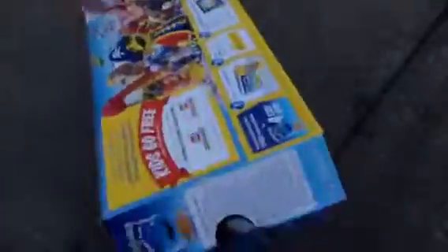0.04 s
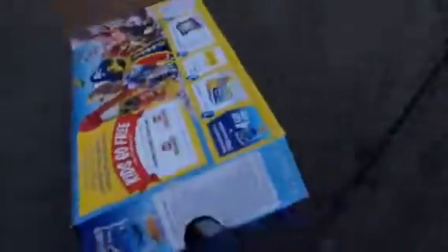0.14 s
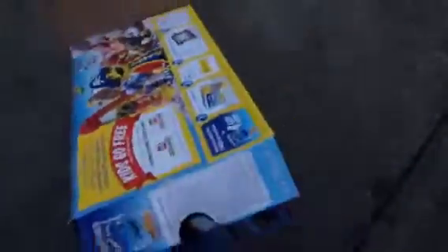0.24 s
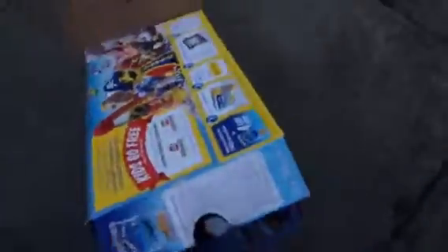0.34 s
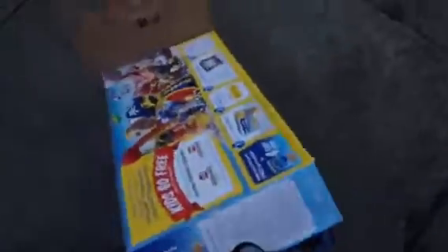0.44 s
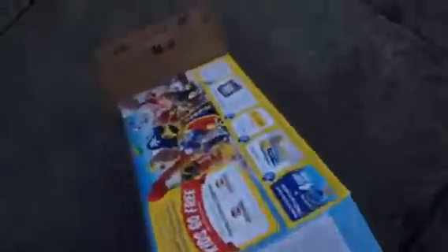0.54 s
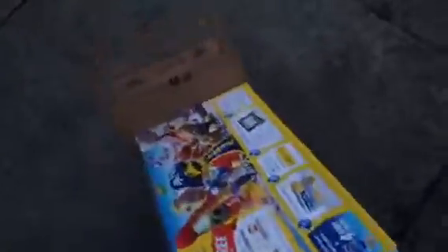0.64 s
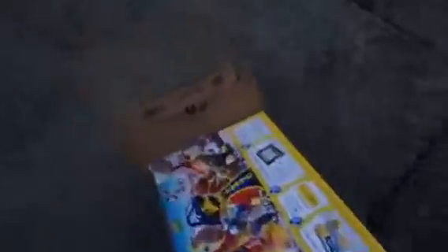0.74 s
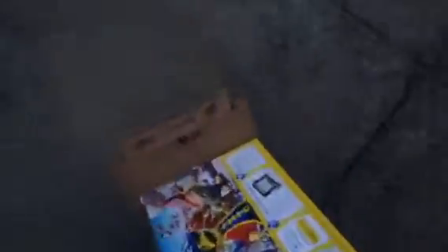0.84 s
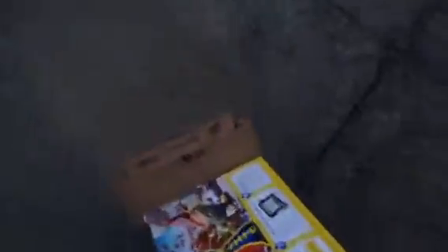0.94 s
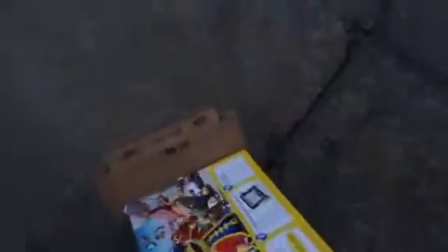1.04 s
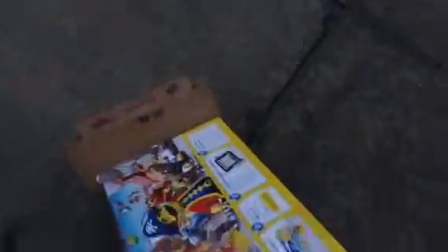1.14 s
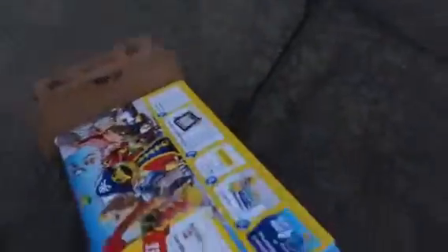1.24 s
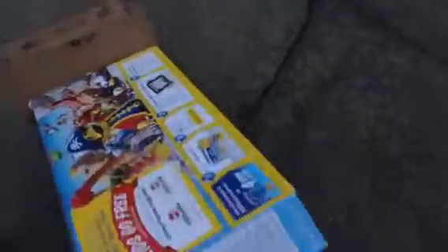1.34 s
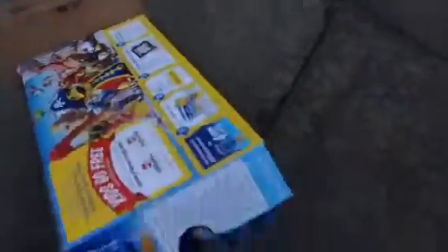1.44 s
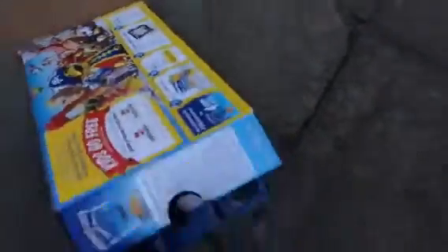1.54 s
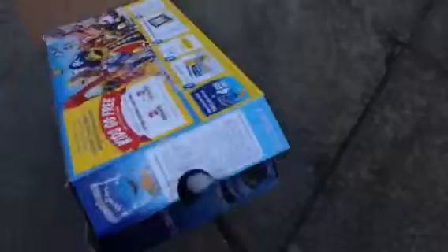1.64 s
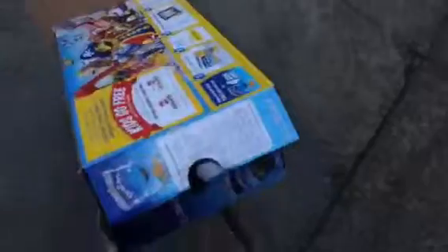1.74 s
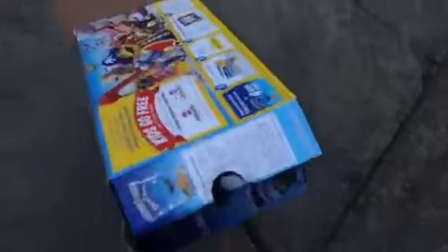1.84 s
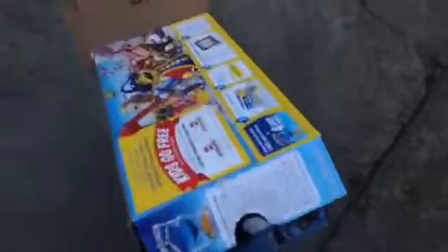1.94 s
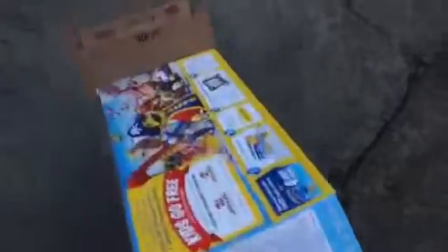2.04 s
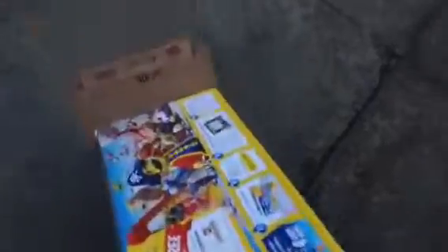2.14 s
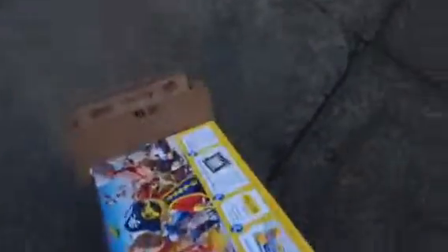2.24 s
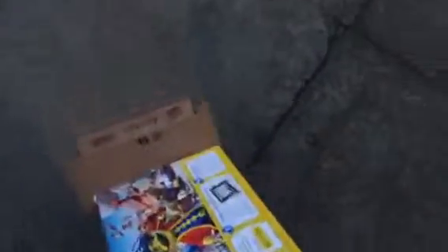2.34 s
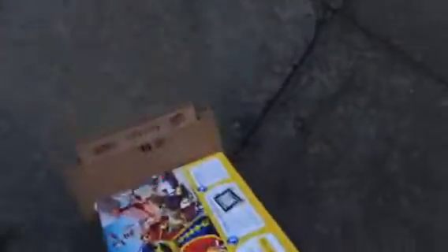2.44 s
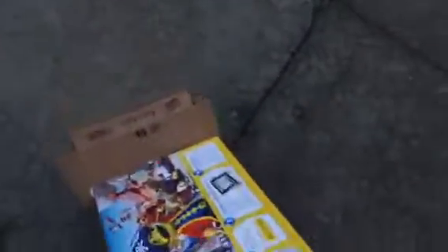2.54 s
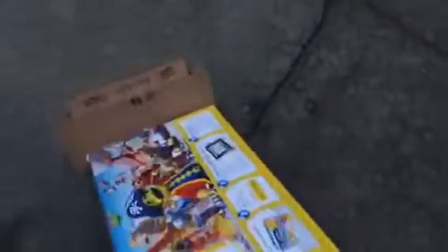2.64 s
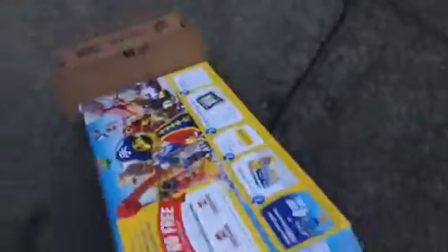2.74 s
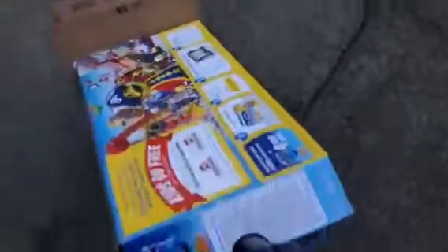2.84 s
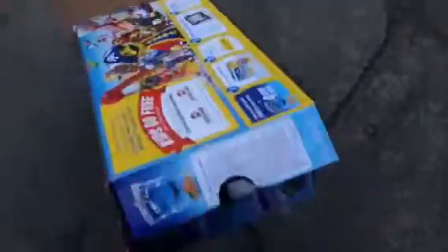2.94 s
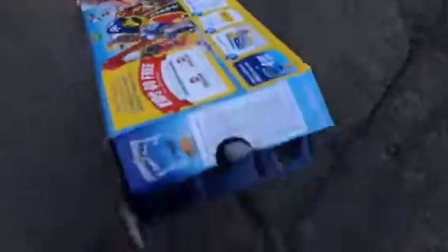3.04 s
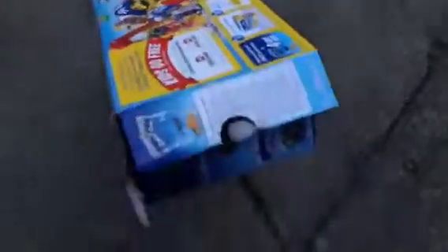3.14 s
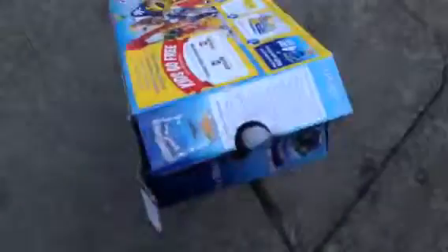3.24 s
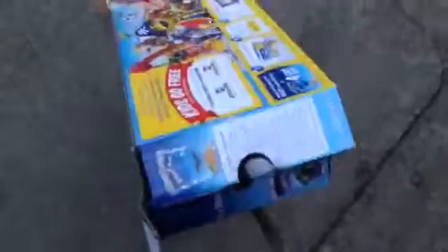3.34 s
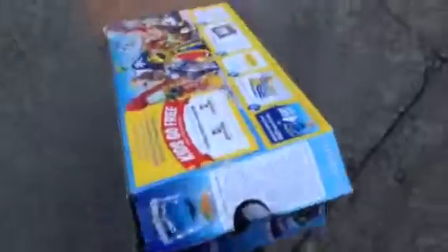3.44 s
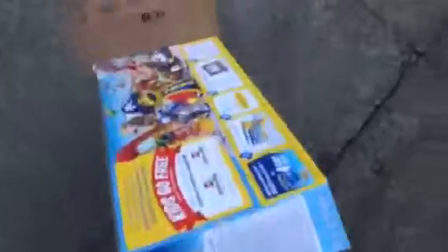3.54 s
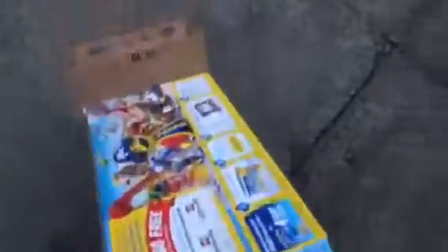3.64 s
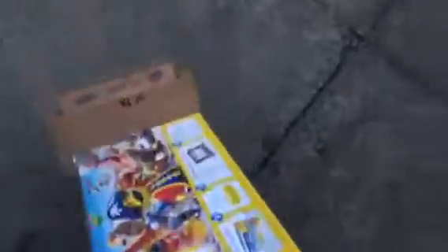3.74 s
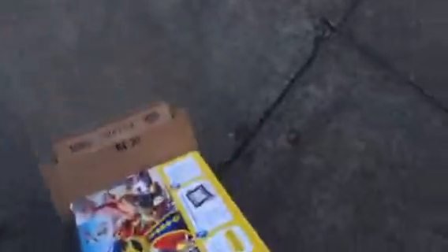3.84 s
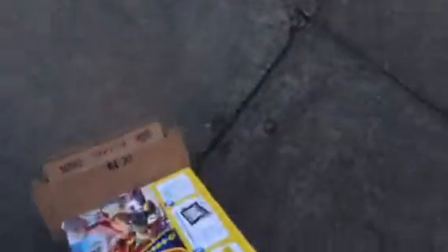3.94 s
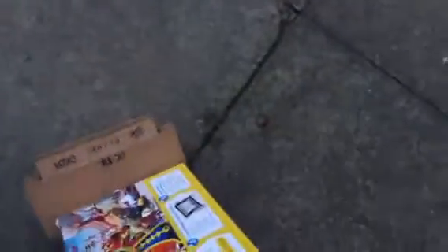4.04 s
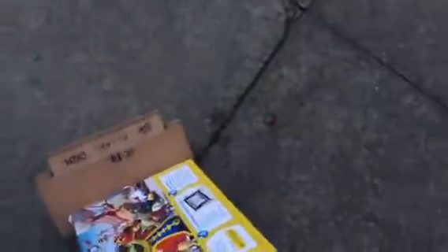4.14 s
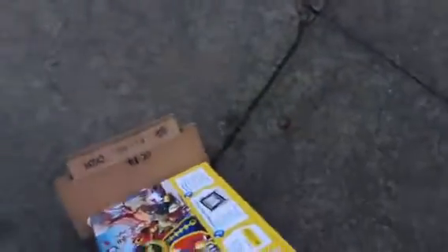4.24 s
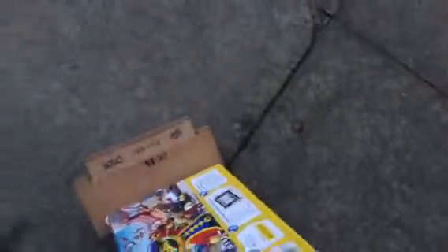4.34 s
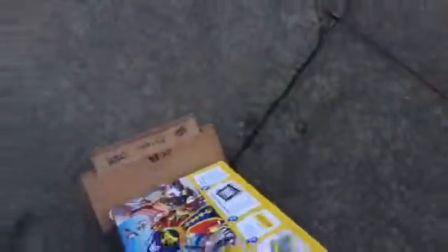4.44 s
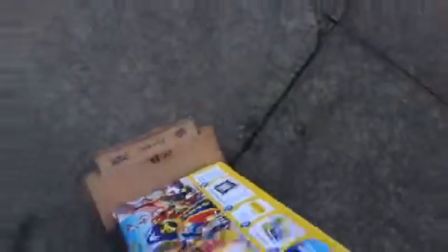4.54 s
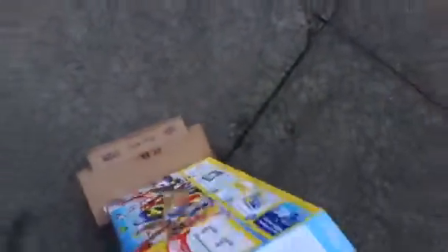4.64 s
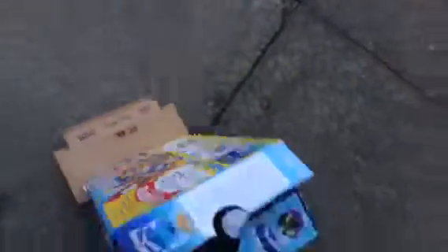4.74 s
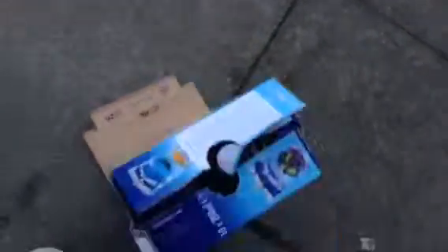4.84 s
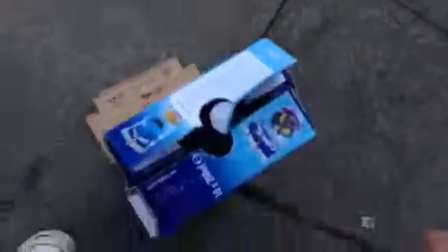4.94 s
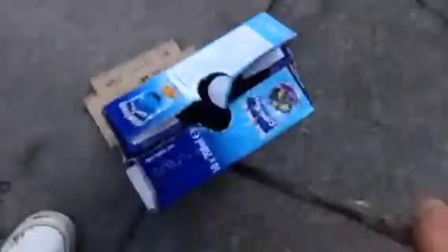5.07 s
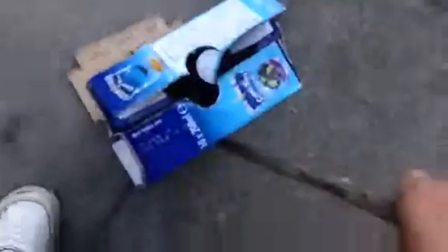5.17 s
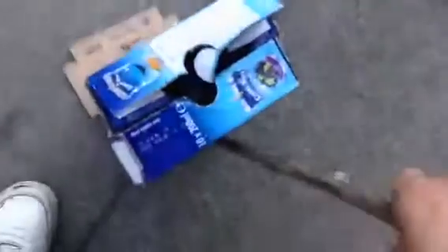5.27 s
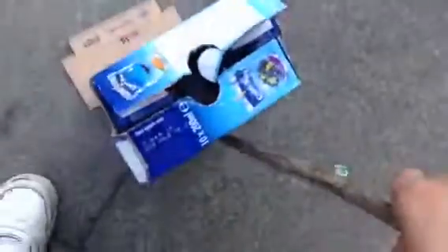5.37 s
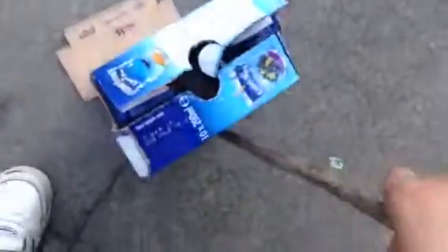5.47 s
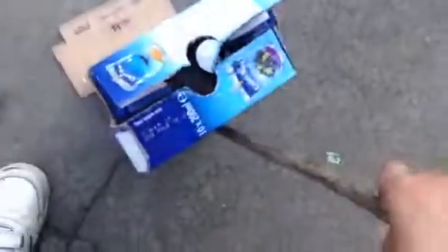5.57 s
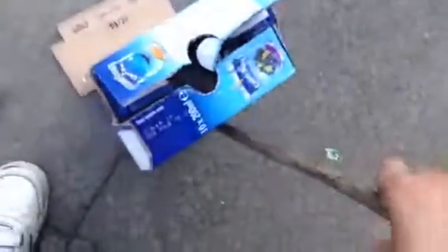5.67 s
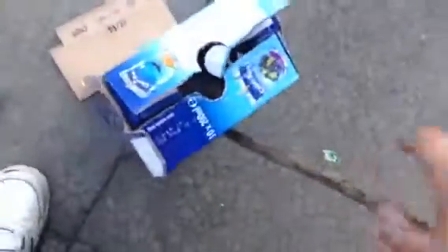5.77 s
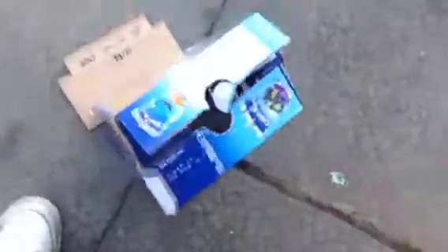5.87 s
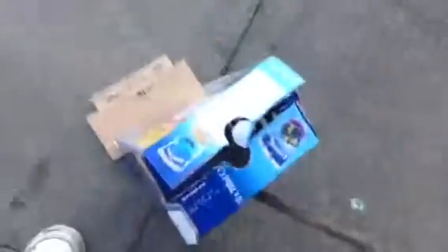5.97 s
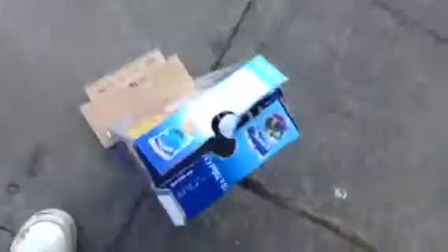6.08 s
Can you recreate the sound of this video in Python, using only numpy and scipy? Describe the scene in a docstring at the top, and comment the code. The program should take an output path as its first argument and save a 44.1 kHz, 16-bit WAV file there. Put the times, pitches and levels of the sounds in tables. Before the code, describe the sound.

Outdoors, close by, cardboard scrapes and chatters over gritty concrete, swelling and easing six times as an empty box is pushed along. After about four seconds it stops with a small hollow knock, and a quick cluster of light taps follows as it tips. A bird whistles in the background throughout, left faint at the end with a low hum of wind and far traffic.

```python
"""An empty cardboard box is shoved over concrete paving in six strokes, close by.
Friction makes its edge hop some 50 to 70 times a second; each landing crushes grit and excites
the resonances of the panels. The box then drops flat and tips over with a few light taps.
A songbird, farther off, whistles throughout and adds a few rasping calls near the end.
Walls and ground return diffuse echoes, and wind and distant roads murmur underneath."""
import sys
import numpy as np
from scipy import signal
from scipy.io import wavfile
from scipy.ndimage import uniform_filter1d

SR = 44100
rng = np.random.default_rng(int(sys.argv[2]) if len(sys.argv) > 2 else 0)


def pcm_store(signal):
    """Save signal as 16-bit PCM."""
    levels = np.round(np.clip(np.atleast_2d(signal), -1, 1) * 32767)
    wavfile.write(sys.argv[1], SR, levels.astype(np.int16).T)


N = 269397
TIME = np.arange(N) / SR
HZ = np.fft.rfftfreq(4096, 1 / SR)  # frequency grid of the filters
CREEP_DB, REST_S, REST_DB_PER_S = -28, 4.2, 155  # the box creeps between shoves, then comes to rest

# Shoves: start t/s, fastest t/s, end t/s, card rasp level/dB, grit level/dB, panel boom level/dB,
# exponent of speed while gaining, and while slowing, hop rate/Hz, share of the power in hops (0-1)
STROKES = [(-.25, 0.028, .43, -33, -34.5, -36, .7, 0.66, 52, 0.7),
           (0.467, 0.919, 1.133, -32, -36, -35, 0.83, 0.92, 60, 0.73),
           (1.162, 1.356, 1.876, -33, -33, -36.5, 1, 0.74, 61, 0.56),
           (1.911, 2.317, 2.567, -30.5, -36, -34.5, 0.73, 1, 65, 0.6),
           (2.6, 2.83, 3.291, -32.5, -31.5, -36, 0.68, 0.69, 70, 0.41),
           (3.358, 3.88, 4.07, -33.5, -35.5, -38, 0.54, 0.85, 55, 0.62)]
# Hard landings on bumps in the concrete: t/s, grit level/dB, card rasp level/dB
LANDINGS = [(0.0315, -30, -26), (0.1296, -38, -30), (0.1431, -13, -26.5), (0.2279, -23.5, -33),
            (0.3045, -46, -35.5), (0.3411, -28.5, -30), (0.3561, -21.5, -28), (0.562, -33, -25.5),
            (0.7133, -15, -18.5), (0.7325, -26, -20), (0.7485, -26.5, -21.5), (0.776, -33, -29),
            (0.8125, -29, -24.5), (0.8735, -26.5, -30), (0.9025, -31, -32), (0.9165, -29, -31),
            (0.9325, -35.5, -32), (0.9485, -33, -30), (0.9955, -35, -37), (1.0115, -35, -34),
            (1.0285, -31, -31), (1.2441, -26, -22.5), (1.2645, -19.5, -29.5), (1.3079, -17, -40),
            (1.3289, -31, -25), (1.4205, -32, -32.5), (1.4495, -45, -23), (1.5015, -25, -43),
            (1.5335, -40, -23), (1.5539, -19, -20.5), (1.5868, -19, -35), (1.6367, -22, -40),
            (1.7255, -30, -29), (1.9555, -38, -32), (2.0068, -23.5, -21), (2.0555, -34, -21.5),
            (2.0737, -30, -23.5), (2.1086, -25.5, -25), (2.1425, -26.5, -29), (2.1779, -29.5, -24.5),
            (2.2385, -26, -24.5), (2.2975, -35, -21.5), (2.3815, -29, -31), (2.3885, -29.5, -25),
            (2.7165, -32, -28.5), (2.7756, -23, -29), (2.8675, -28.5, -28), (2.9402, -17.5, -29),
            (2.9704, -24, -24), (3.0205, -17, -27), (3.0305, -21, -31.5), (3.0748, -25, -26),
            (3.1048, -22, -58), (3.1985, -27, -53), (3.2675, -25, -39), (3.3702, -23.5, -27.5),
            (3.4306, -28.5, -51), (3.5045, -29.5, -24), (3.5365, -46, -23), (3.5518, -47, -24.5),
            (3.565, -31.5, -21.5), (3.6045, -28, -26), (3.6212, -25, -29), (3.6808, -31, -23),
            (3.7685, -23, -18.5), (3.7932, -28, -25), (3.8203, -27, -20), (3.8422, -28, -21.5),
            (3.862, -25, -16.5), (3.8822, -31, -22), (3.9052, -26.5, -20.5), (3.922, -32, -19),
            (3.9598, -39, -23), (4.0063, -28.5, -26.5), (4.027, -34, -35.5)]
# Broad spectrum of card on concrete: f/Hz, relative level/dB
CARD_SPECTRUM = [(25, -29.5), (60, -29.5), (90, -25), (125, -8.5), (180, 3.5), (260, -3.5), (380, -1),
                 (480, -7.5), (560, -0.5), (1250, 2.5), (2000, -7.5), (2950, -19.5), (3400, -16.5),
                 (7500, -21.5), (12500, -20), (14800, -24.5), (16000, -42)]
# Modes of the panels and the cavity: f/Hz, bandwidth/Hz, level/dB re the broad spectrum
BOX_MODES = [(199, 43, 5.5), (306.4, 9.7, 10), (388, 31, 4), (528, 67, 3.5), (646.4, 11, 6),
             (1030, 180, 2.5), (1263, 100, 2.5), (1600, 140, 2.5), (2050, 56, 0), (3900, 74, -7),
             (9750, 750, -2)]
# Swells of a panel or cavity resonance: middle t/s, half duration/s, level/dB, f/Hz, width/octaves
RESONANT_SWELLS = [(0.05, 0.17, -32.5, 228, 0.7), (0.213, 0.25, -39, 1470, 0.52),
                   (0.8, 0.04, -34.5, 241, 0.46), (0.934, 0.11, -30.5, 774, 0.5),
                   (1.05, 0.1, -35.5, 205, 0.67), (1.42, 0.16, -29, 307, 0.5),
                   (1.572, 0.36, -36.5, 1450, 0.23), (2.395, 0.15, -33, 820, 0.55),
                   (2.656, 0.098, -32, 330, 0.57), (2.78, 0.21, -36, 936, 0.41),
                   (3.02, 0.18, -32.5, 1450, 0.23), (3.845, 0.063, -22.5, 296, 0.48),
                   (3.944, 0.12, -33, 720, 0.5), (4.033, 0.065, -35, 180, 0.52)]
# Spectrum of the distant murmur: f/Hz, relative level/dB
AIR_SPECTRUM = [(20, -39.5), (60, -27.5), (120, -11.5), (200, 6.5), (270, -1.5), (600, -14.5), (1000, -6),
                (1400, -17), (2000, -18.5), (3500, -29.5), (6000, -30), (14000, -30.5), (16000, -50)]
# Slow course of the distant murmur: t/s, level/dB
AIR_LEVELS = [(0, -61.5), (4.35, -61), (5.0, -61), (5.7, -64), (6.1, -63.5)]
# Reverberation of the surroundings: f/Hz, T60/s
YARD_DECAY = [(200, 0.91), (600, 0.65), (1200, 0.25), (3000, 0.7), (12000, 0.11)]
# Whistled notes: t/s, duration/s, start f/Hz, middle f/Hz, end f/Hz, level/dB, hoarseness (0-1)
BIRD_NOTES = [(0.39, 0.4, 2245, 2230, 2430, -54.5, 0.9), (1.013, 0.12, 2080, 2083, 2050, -45.5, 0.33),
              (1.105, 0.16, 2833, 2795, 2808, -39, 0), (1.252, 0.071, 2210, 2206, 2170, -39, 0.25),
              (1.88, 0.19, 8050, 7500, 6730, -62, 0.4), (2.441, 0.12, 2200, 2300, 2245, -45, 0.73),
              (2.535, 0.052, 2220, 2160, 2210, -45, 0.12), (3.305, 0.13, 2470, 2810, 2540, -42.5, 0.22),
              (3.409, 0.079, 2680, 2540, 2280, -49, 0.5), (3.425, 0.095, 5350, 4830, 4500, -49.5, 0.2),
              (4.297, 0.243, 2955, 2925, 2900, -74, 0.63), (4.962, 0.13, 2080, 1930, 1620, -71, 0.5),
              (5.191, 0.13, 1920, 2230, 2490, -65.5, 0.8), (5.291, 0.21, 2350, 2620, 2315, -66.5, 0.43),
              (5.369, 0.29, 1885, 1900, 1890, -78.5, 0.5), (5.505, 0.125, 2270, 2190, 1950, -60, 0.37),
              (5.639, 0.089, 2140, 2235, 2160, -72.5, 0.8), (5.74, 0.05, 2540, 2200, 1910, -64.5, 0.7),
              (5.797, 0.05, 2440, 2050, 1810, -70, 0.7), (5.91, 0.19, 1690, 1810, 1760, -77.5, 0.7),
              (6.043, 0.11, 2100, 2285, 2490, -66.5, 0.7)]
# Bouncing in the last shove: start t/s, end t/s, dragging gain/dB, panel thump gain/dB
BOUNCING = (3.776, 3.935, -7, 4)
# Faint rubs on the paving: t/s, duration/s, level/dB, centre f/Hz
SCUFFS = [(4.104, 0.045, -54, 4400), (4.143, 0.063, -46, 820), (4.742, 0.066, -72.5, 2900),
          (5.497, 0.079, -65.5, 3900), (5.852, 0.096, -66.5, 3540)]
# The box dropping flat: t/s, peak level/dB of the cavity note, f/Hz, T60/s
FLAT_DROP = (4.1505, -30, 404, .055)
# Taps of the tipping box: t/s, tick peak level/dB, centre f/Hz, width/octaves,
# then relative to the tick: panel ring level/dB, flap ring level/dB, rattle level/dB
TAPS = [(4.216, -46, 5090, 1.7, -19, -40, -22), (4.868, -33, 1600, 0.7, -32, -30, -30),
        (4.9052, -37, 4200, .9, -32, -14, -30), (4.9078, -37, 3800, .95, -32, -2, -30),
        (4.921, -38.5, 2200, 1.1, -10, -25, -12), (4.936, -15, 4700, 1.4, -35, -26, -26),
        (4.9396, -24, 3900, 1.4, -24, -14, -19)]
# Toneless bird calls: t/s, duration/s, start f/Hz, end f/Hz, half bandwidth/Hz, level/dB
HARSH_CALLS = [(4.276, 0.17, 3320, 3520, 520, -71), (5.708, 0.12, 2900, 2515, 380, -69),
               (5.84, 0.1, 3280, 3220, 110, -74.5)]


def amp(db):
    """Amplitude ratio of a level in decibels."""
    return 10 ** (np.asarray(db) / 20)


def unit_rms(x):
    """Normalisation to a mean power of 1."""
    return x / np.sqrt(np.mean(x ** 2) + 1e-20)


def spectrum_at(points, hz):
    """Interpolation on a logarithmic frequency axis."""
    f, value = np.transpose(points)
    return np.interp(np.log(hz + 1), np.log(f + 1), value)


def add(mix, s, sound):
    """Superposition: a sound joins the mix at s seconds."""
    part = mix[max(round(s * SR), 0):][:len(sound)]
    part += sound[:len(part)]


def colour(x, gain):
    """Minimum-phase filtering at unit energy, shaped by a gain on the HZ grid."""
    log_gain = np.log(np.maximum(gain / gain.max(), 1e-5))
    two_sided = np.concatenate([log_gain, log_gain[-2:0:-1]])
    response = np.fft.ifft(np.exp(np.conj(signal.hilbert(two_sided)))).real
    return signal.oaconvolve(x, response / np.linalg.norm(response))[:len(x)]


def bell(hz, octaves):
    """Band-pass gain, Gaussian in log frequency."""
    return np.exp(-.5 * (np.log2((HZ + 1) / hz) / octaves) ** 2)


def wander(size, cutoff_hz):
    """Random fluctuation: low-passed noise of rms 1."""
    lowpass = signal.butter(2, cutoff_hz, fs=SR, output="sos")
    smooth = signal.sosfiltfilt(lowpass, rng.standard_normal(size + SR))
    return unit_rms(smooth[SR // 2:][:size])


def grains(size, per_s, spread_db):
    """Shot noise: random impulses of uneven size, as when sand grains catch and let go."""
    occurs = rng.random(size) < per_s / SR
    strength = amp(spread_db * np.clip(rng.standard_normal(size), -2, 2))
    return unit_rms(occurs * strength * rng.choice([-1, 1], size))


def pulse(t, rise_s, fall_s):
    """Transient envelope: a smooth onset and exponential decay."""
    return (1 - np.exp(-(t / rise_s) ** 2)) * np.exp(-t / fall_s)


def stroke_at(t):
    """Piecewise-constant friction settings: the columns of the latest shove at times t."""
    rows = np.array(STROKES)
    return rows[np.maximum(np.searchsorted(rows[:, 0], t, "right") - 1, 0)].T


def sliding_gain(exponent_scale=1):
    """Friction noise grows as a power of sliding speed, above a floor of faint creep."""
    speed = sum(np.sin(np.pi / 2 * np.interp(TIME, row[:3], [0, 1, 0])) for row in STROKES)
    _, fastest_s, *_, gaining, slowing, _, _ = stroke_at(TIME)
    exponent = exponent_scale * np.where(TIME < fastest_s, gaining, slowing)
    creep = amp(CREEP_DB - REST_DB_PER_S * np.maximum(TIME - REST_S, 0))
    return np.hypot(speed ** exponent, creep)


def hop_force(jitter=0.19, spread_db=1.0):
    """Intermittent contact: between hard landings the edge hops in a nearly periodic pulse train."""
    marks = [0] + [row[0] for row in LANDINGS] + [REST_S]
    hop = pulse(np.arange(SR // 20) / SR, rise_s=.0016, fall_s=.006)
    force = np.zeros(N)
    for start, end in zip(marks, marks[1:]):
        *_, per_s, _ = stroke_at((start + end) / 2)
        count = max(round((end - start) * per_s), 1)
        period = (end - start) / count
        late, size = np.clip(rng.standard_normal((2, 96)), -2, 1)
        add(force, start, hop)
        for k in range(1, count):
            add(force, start + (k + jitter * late[k]) * period, amp(spread_db * size[k]) * hop)
    return force / np.sqrt(np.mean(force[TIME < REST_S] ** 2))


def pressure(force, hop_share):
    """Steady dragging and hopping add in power."""
    return np.sqrt(1 - hop_share + hop_share * force ** 2)


def box_bands(boom_top_hz=450, grit_foot_hz=2500):
    """Modal response of the box, split into panel boom, card rasp and grit hiss."""
    modes = sum(amp(db) ** 2 / (1 + (2 * (HZ - hz) / width) ** 2) for hz, width, db in BOX_MODES)
    whole = amp(spectrum_at(CARD_SPECTRUM, HZ)) * np.sqrt(1 + modes)
    low, mid = (1 / (1 + (HZ / edge) ** 10) for edge in (boom_top_hz, grit_foot_hz))
    return whole * np.sqrt(low), whole * np.sqrt(mid - low), whole * np.sqrt(1 - mid)


def edge_response(ring, fall_s=0.0013):
    """Impulse response of one spot on the edge: a click and brief random resonances."""
    t = np.arange(SR // 100) / SR
    tail = rng.standard_normal(len(t)) * np.exp(-t / fall_s)
    response = (t == 0) + ring * tail / np.linalg.norm(tail)
    return response / np.linalg.norm(response)


def moving_contact(x, ring, moves_per_s=70, spots=16):
    """Resonances depend on the driving point, which jumps along the edge."""
    spot = rng.integers(0, spots, N)[np.cumsum(rng.random(N) < moves_per_s / SR)]
    return sum(signal.oaconvolve(x * (spot == k), edge_response(ring))[:N] for k in range(spots))


def scrape(force, grit_hopping=0.84, tick_db=-7):
    """Sliding friction: grains excite the box in bursts as the edge lands, thinly as it drags."""
    _, _, _, rasp_db, grit_db, boom_db, *_, hop_share = stroke_at(TIME)
    sliding = sliding_gain()
    drag = pressure(force, hop_share) * sliding
    crunch = pressure(force, hop_share * grit_hopping) * sliding
    boom_band, rasp_band, grit_band = box_bands()
    # Fine sand crackles in clumps a few milliseconds long; the odd coarse grain ticks.
    clumps = amp(2.4 * np.clip(wander(N, 260), -2, 2))
    fine = clumps * grains(N, 9000, spread_db=1.5)
    coarse = amp(tick_db) * grains(N, 250, spread_db=4.5)
    boom = grains(N, 4000, spread_db=5.5) * drag * amp(boom_db)
    rasp = moving_contact(grains(N, 8000, spread_db=1.5) * drag * amp(rasp_db), ring=0.88)
    grit = moving_contact(unit_rms(fine + coarse) * crunch * amp(grit_db), ring=0.44)
    return colour(boom, boom_band) + colour(rasp, rasp_band) + colour(grit, grit_band)


def drumming(force):
    """Forced vibration: as the box flexes, the hops drive one resonance harder, then another."""
    boom_band, rasp_band, _ = box_bands()
    body = np.hypot(boom_band, rasp_band)
    shake = grains(N, 6000, spread_db=1.5) * pressure(force, hop_share=0.83) * sliding_gain(0.65)
    out = np.zeros(N)
    for s, half_s, db, hz, octaves in RESONANT_SWELLS:
        swell = amp(db) * np.exp(-((TIME - s) / half_s) ** 2)
        out += colour(shake * swell, body * bell(hz, octaves))
    return out


def outdoor_air():
    """Ambient noise: wind and far roads merge into a slowly varying murmur."""
    level_db = np.interp(TIME, *np.transpose(AIR_LEVELS))
    return amp(level_db) * colour(rng.standard_normal(N), amp(spectrum_at(AIR_SPECTRUM, HZ)))


def yard_echo(x):
    """Reverberation: sparse reflections from walls and ground, the top treble dying first."""
    hz, t, reflections = signal.stft(grains(SR, 2900, spread_db=-14.0), SR, nperseg=256)
    decay = amp(-60 * t / spectrum_at(YARD_DECAY, hz)[:, None])
    onset = 1 - np.exp(-t / 0.0023)
    tail = signal.istft(reflections * decay * onset, SR, nperseg=256)[1]
    return signal.oaconvolve(x, tail / np.linalg.norm(tail))[:N]


def hard_landings(boom_re_rasp_db=-6, equivalent_s=0.0018):
    """Impact excitation: each hard landing crushes a clump of grit and thumps the panels."""
    out, t = np.zeros(N), np.arange(SR // 12) / SR
    boom_band, rasp_band, grit_band = box_bands()
    start, end, _, bounce_db = BOUNCING
    for s, grit_db, rasp_db in LANDINGS:
        thump_db = rasp_db + boom_re_rasp_db + bounce_db * (start < s < end)
        spot = edge_response(ring=0.38)
        for band, db, force in ((boom_band, thump_db, pulse(t, rise_s=0.0016, fall_s=0.0039)),
                                (rasp_band, rasp_db, pulse(t, rise_s=0.0016, fall_s=0.0041)),
                                (grit_band, grit_db, pulse(t, rise_s=0.00058, fall_s=0.0052))):
            crush = grains(len(t), 16000, spread_db=5) * force
            burst = colour(signal.oaconvolve(crush, spot), band)
            # The burst has the energy of its level held for equivalent_s.
            add(out, s, amp(db) * burst / np.linalg.norm(burst) * np.sqrt(equivalent_s * SR))
    return out


def bird_whistles(pitch_depth=.032, strength_depth=.7):
    """Gliding pure tones; random frequency and amplitude modulation makes them hoarse."""
    out = np.zeros(N)
    waver, throb = wander(N, 160), wander(N, 60)
    for s, length, first_hz, middle_hz, last_hz, db, hoarse in BIRD_NOTES:
        size, onset = int(length * SR), int(s * SR)
        arch = np.polyfit([0, .5, 1], [first_hz, middle_hz, last_hz], 2)
        hz = np.polyval(arch, np.linspace(0, 1, size))
        hz *= 1 + pitch_depth * hoarse * np.roll(waver, -onset)[:size]
        flutter = 1 + strength_depth * hoarse * np.roll(throb, -onset)[:size]
        tone = np.sin(2 * np.pi * np.cumsum(hz) / SR)
        add(out, s, amp(db) * unit_rms(signal.windows.tukey(size, .5) * flutter * tone))
    return out


def scattered(x, db=-13, fall_s=.035):
    """Multipath propagation blurs each note and softens its end."""
    t = np.arange(SR // 4) / SR
    tail = rng.standard_normal(len(t)) * np.exp(-t / fall_s)
    return x + amp(db) * signal.oaconvolve(x, tail / np.linalg.norm(tail))[:N]


def far_echo(x, db=-12.5, t60_s=1.3):
    """Diffuse reflection from distant walls builds up late and lingers."""
    t = np.arange(SR) / SR
    tail = rng.standard_normal(SR) * pulse(t, rise_s=0.07, fall_s=t60_s / np.log(1000))
    return amp(db) * signal.oaconvolve(x, tail / np.linalg.norm(tail))[:N]


def lift_gain(ramp_s=0.018):
    """Loss of contact: the dragging thins while the bouncing edge is mostly in the air."""
    start, end, drag_db, _ = BOUNCING
    bouncing = (TIME > start) & (TIME < end)
    return amp(uniform_filter1d(drag_db * bouncing, round(ramp_s * SR)))


def scuffs():
    """Light friction on gritty ground: short rubs, each with resonances of its own."""
    out = np.zeros(N)
    for s, length, db, hz in SCUFFS:
        size = int(length * SR)
        grit = grains(size, 3000, spread_db=2)
        rub = signal.oaconvolve(grit, edge_response(ring=2, fall_s=.0015))[:size]
        add(out, s, amp(db) * np.hanning(size) * colour(rub, bell(hz, 0.8)))
    return out


def flat_drop():
    """Cavity resonance: the box drops flat with a dull tick and the air inside gives a hollow note."""
    out, t = np.zeros(N), np.arange(SR // 4) / SR
    s, db, hz, t60_s = FLAT_DROP
    tick = colour(rng.standard_normal(len(t)) * np.exp(-t / .0008), bell(1400, .35))
    note = np.sin(2 * np.pi * hz * t) * pulse(t, rise_s=.0025, fall_s=t60_s / np.log(1000))
    add(out, s, amp(db) * (note / abs(note).max() + 0.39 * tick / abs(tick).max()))
    return out


def flap_taps(panel_hz=305, panel_t60_s=0.16, flap_hz=2470, hiss_db=-46, hiss_hz=8200):
    """Damped free vibration: flaps strike the ground and rattle; flap and panel ring over a faint hiss."""
    out, t = np.zeros(N), np.arange(SR // 4) / SR
    panel = np.sin(2 * np.pi * panel_hz * t) * pulse(t, rise_s=0.0028, fall_s=panel_t60_s / np.log(1000))
    flap = np.sin(2 * np.pi * flap_hz * t) * np.exp(-t / 0.0033)
    for s, db, hz, octaves, panel_db, flap_db, rattle_db in TAPS:
        snap = np.exp(-t / 0.00084) + amp(rattle_db) * np.exp(-t / 0.015)
        tick = colour(rng.standard_normal(len(t)) * snap, bell(hz, octaves))
        ring = amp(panel_db) * panel + amp(flap_db) * flap
        hiss = colour(rng.standard_normal(len(t)), bell(hiss_hz, 0.59)) * np.exp(-t / 0.041)
        add(out, s, amp(db) * (tick / abs(tick).max() + ring + amp(hiss_db) * hiss))
    return out


def harsh_calls():
    """Noise modulating a gliding carrier gives the bird a toneless, sliding band."""
    out = np.zeros(N)
    for s, length, first_hz, last_hz, half_hz, db in HARSH_CALLS:
        size = int(length * SR)
        phase = 2 * np.pi * np.cumsum(np.linspace(first_hz, last_hz, size)) / SR
        band = wander(SR, half_hz)[:size] * np.cos(phase) + wander(SR, half_hz)[:size] * np.sin(phase)
        add(out, s, amp(db) * unit_rms(signal.windows.tukey(size, .5) * band))
    return out


def scene(box_echo_db=-24, bird_echo_db=-14):
    """The direct-to-reverberant ratio falls with distance: the box is almost dry, the bird wetter."""
    force = hop_force()
    dragging = (scrape(force) + drumming(force)) * lift_gain()
    box = dragging + hard_landings() + flat_drop() + flap_taps() + scuffs()
    song = scattered(bird_whistles() + harsh_calls())
    echoes = yard_echo(amp(box_echo_db) * box + amp(bird_echo_db) * song) + far_echo(song)
    return (box + song + echoes + outdoor_air())[None]


def record(dry, cutoff_hz=15700):
    """Band limiting: a linear-phase low-pass removes the highest treble."""
    lowpass = signal.firwin(255, cutoff_hz, window=("kaiser", 8), fs=SR)
    return signal.oaconvolve(dry, lowpass[None], "same")


dry = scene()
out = record(dry)
pcm_store(out)
```